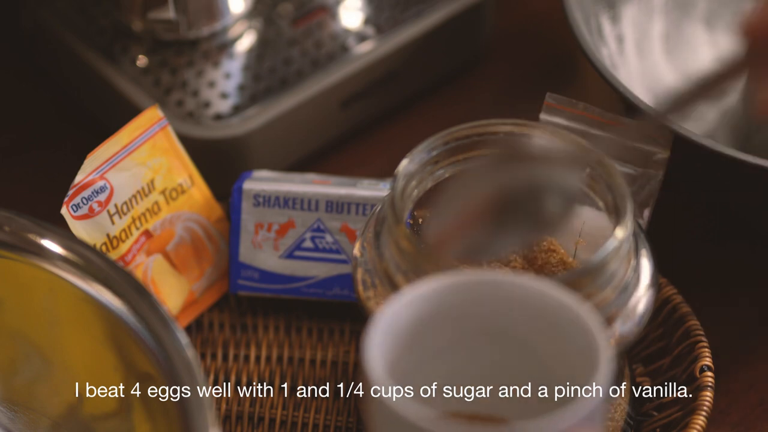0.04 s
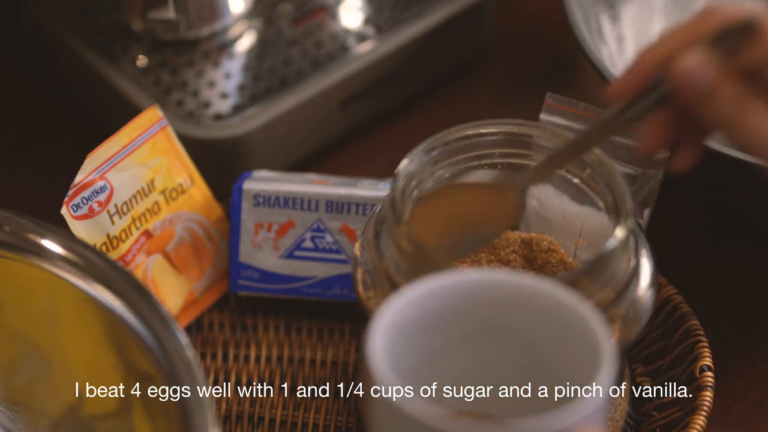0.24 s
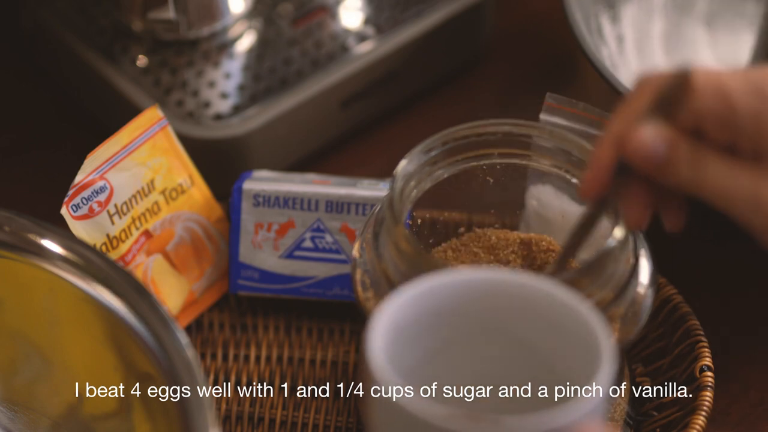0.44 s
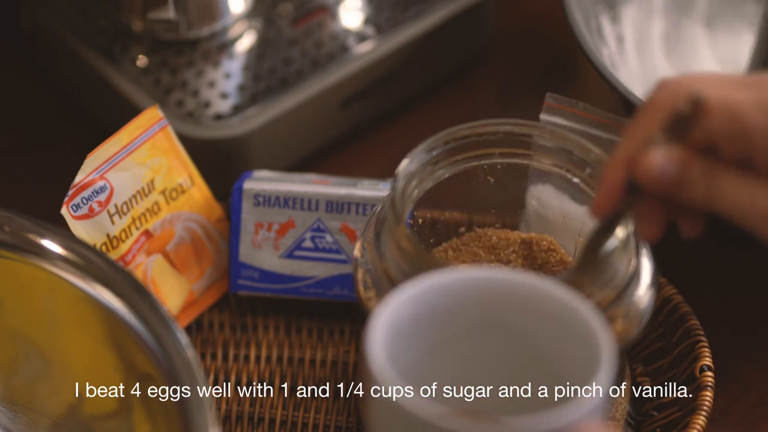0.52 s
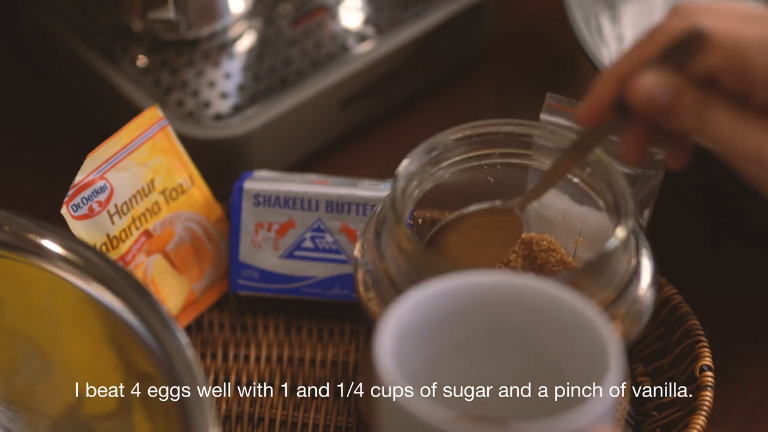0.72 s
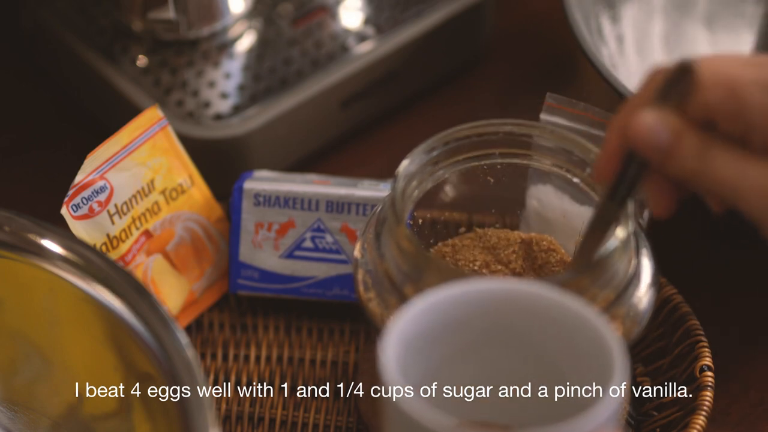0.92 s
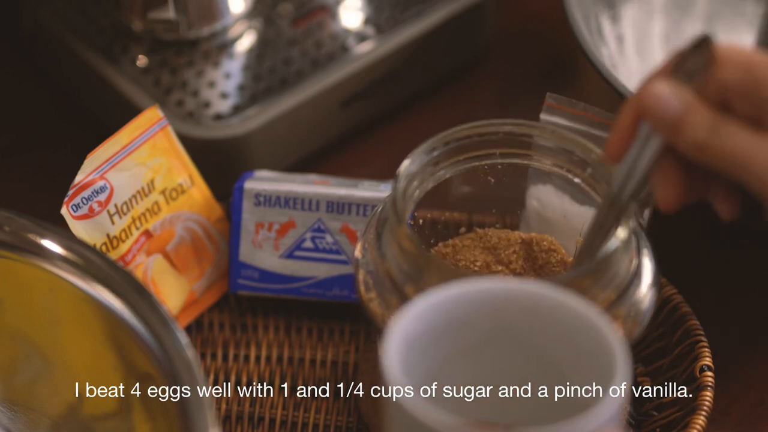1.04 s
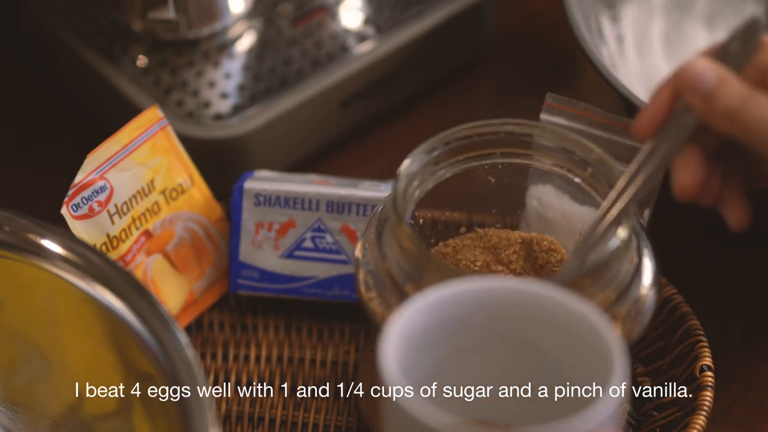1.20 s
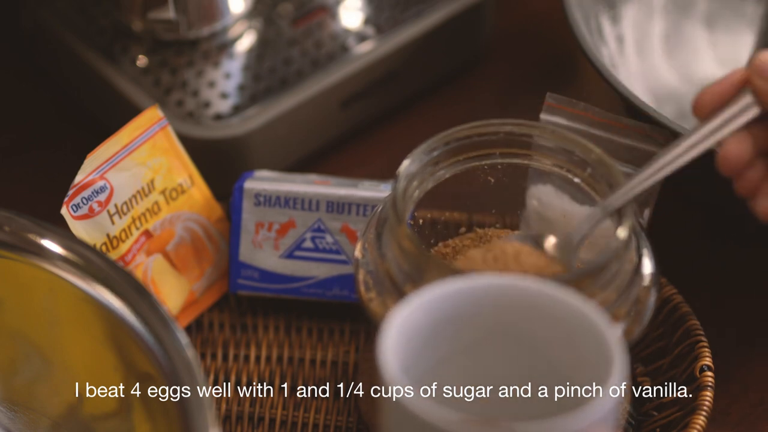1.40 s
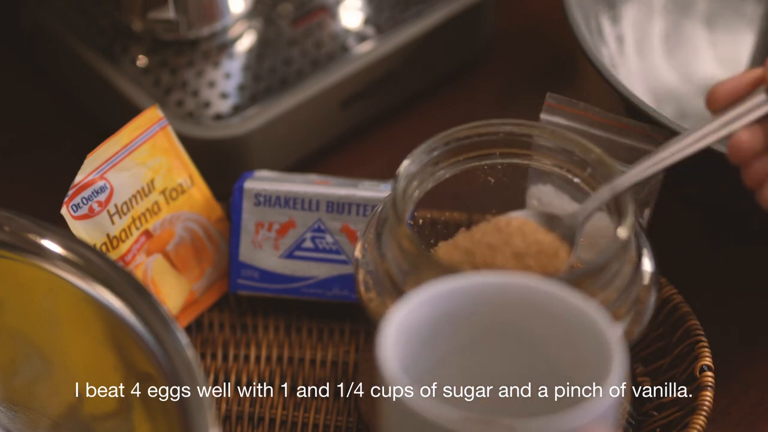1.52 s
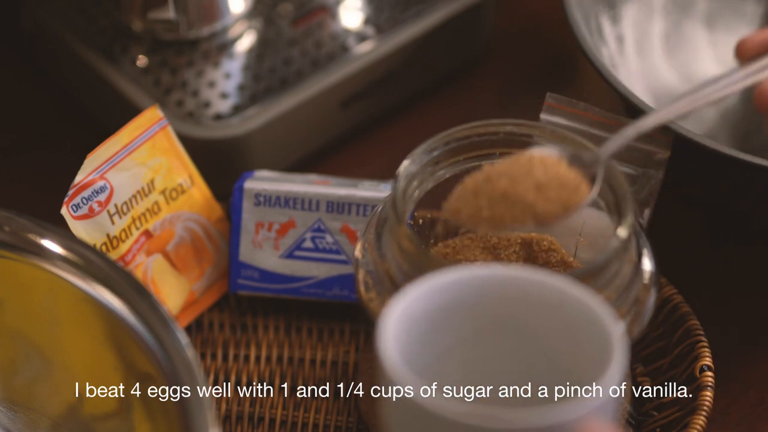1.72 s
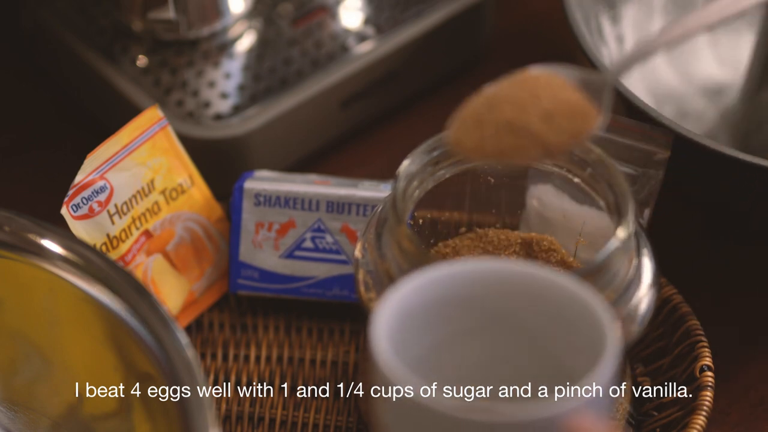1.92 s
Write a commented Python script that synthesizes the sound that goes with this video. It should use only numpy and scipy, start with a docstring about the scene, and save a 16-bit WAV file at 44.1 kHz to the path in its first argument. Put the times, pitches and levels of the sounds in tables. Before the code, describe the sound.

Close by in a quiet kitchen, a metal spoon strikes a glass jar with a sharp clink, then crunches through coarse sugar in small pushes, tapping the wall as the jar faintly bumps in a wicker basket.

```python
"""In a quiet kitchen, a metal spoon clinks into a glass jar and digs through coarse sugar.
Each contact excites the normal modes of spoon and glass; each push fractures crystals, a dense
train of impulses coloured by the air in the jar. The spoon knocks on the wall and squeaks once by
stick-slip friction, and the jar shifts with dull bumps in the wicker basket that it stands in."""
import sys
import numpy as np
from scipy import signal
from scipy.fft import rfft, irfft
from scipy.io import wavfile

SR = 44100
rng = np.random.default_rng(int(sys.argv[2]) if len(sys.argv) > 2 else 0)


def generate_wav(signal):
    """Clip the signal to [-1, 1] and save it as 16-bit WAV at the path in sys.argv[1]."""
    frames = np.transpose(np.atleast_2d(signal))
    scaled = np.clip(frames, -1, 1) * 32767
    pcm = np.round(scaled).astype(np.int16)
    wavfile.write(sys.argv[1], SR, pcm)


N = 85995
T = np.arange(N) / SR
HZ = np.maximum(np.arange(N // 2 + 1) * SR / N, 1)

# normal modes of spoon and jar: f/Hz, level/dB, t60/s
GLASS_MODES = [(1860, -26.5, 0.067), (2130, -19, 0.056), (2238, -18.5, 0.15), (2324, -16.5, 0.065),
               (2409, -14, 0.082), (3244, -22, 0.09), (3505, -20, 0.099), (3937, -11.5, 0.027),
               (4260, -12.5, 0.03), (4970, -20.5, 0.042), (8385, -18, 0.077), (9580, -32, 0.039)]
# hollow resonances of the jar on its support: f/Hz, level/dB, t60/s
HOLLOW_MODES = [(404, -3.5, .05), (498.4, -3, 0.083), (540.3, -5, 0.14), (665.4, -7.5, 0.047),
                (906, -7, 0.025)]
# shifts of the jar in the basket: peak t/s, rise/s, fall/s, thump level/dB, rub level/dB
JAR_SHIFTS = [(0.365, 0.04, 0.13, -63, -66.5), (0.428, 0.0059, 0.018, -70, -57.5),
              (0.500, 0.084, 0.024, -69, -66), (0.838, 0.017, 0.015, -59, -64.5),
              (1.070, 0.23, 0.31, -67.5, -69.5), (1.443, 0.011, 0.033, -67, -53),
              (1.495, 0.056, 0.037, -59.5, -57.5)]


def from_db(db):
    """Amplitude ratio of a level in decibels."""
    return 10 ** (np.asarray(db) / 20)


def unit_rms(x):
    """Normalisation to unit mean power."""
    return x / np.sqrt(np.mean(x ** 2) + 1e-20)


def at_hz(curve, hz):
    """Interpolation on a logarithmic frequency axis."""
    f, value = np.transpose(curve)
    return np.interp(np.log(hz), np.log(f), value)


def colour(x, spectrum, share=1):
    """Zero-phase filtering by a curve of f/Hz, gain/dB; share scales the decibels."""
    return irfft(rfft(x) * from_db(share * at_hz(spectrum, HZ)), N)


def resonator(x, hz, t60):
    """Damped harmonic oscillator: a unit impulse starts a decaying sine of amplitude 1."""
    radius, angle = from_db(-60 / (t60 * SR)), 2 * np.pi * hz / SR
    return signal.lfilter([0, np.sin(angle)], [1, -2 * radius * np.cos(angle), radius ** 2], x + 1e-18)


def body(x, modes, ring_share=1, pitch=1):
    """Modal superposition with alternating signs; ring_share scales decay times, pitch frequencies."""
    return sum((-1) ** k * from_db(db) * resonator(x, hz * pitch, t60 * max(ring_share, .05))
               for k, (hz, db, t60) in enumerate(modes))


def narrow_tone(hz, width_hz):
    """Narrow-band noise: two passes through one resonance leave a wavering tone of unit rms."""
    t60 = np.log(1000) / (np.pi * width_hz)
    return unit_rms(resonator(resonator(rng.standard_normal(N), hz, t60), hz, t60))


def swell(peak_s, rise_s, fall_s):
    """Gaussian envelope with separate widths before and after its peak."""
    return np.exp(-((T - peak_s) / np.where(T < peak_s, rise_s, fall_s)) ** 2)


def swells(rows):
    """Incoherent addition: swells sum in power, giving one envelope per level column."""
    power = sum((from_db(levels)[:, None] * swell(peak_s, rise_s, fall_s)) ** 2
                for peak_s, rise_s, fall_s, *levels in rows)
    return np.sqrt(power)


def grains():
    """Shot noise of unit rms: random impulses that swell in clumps, a few of them much louder."""
    grains_per_s, clumps_per_s, spread_db, clump_db = 3300, 430, 4.0, 3.0
    sizes = from_db(spread_db * np.minimum(rng.exponential(1, N), 5))
    signs = rng.choice([-1, 1], N)
    clumps = np.interp(T * clumps_per_s, np.arange(N), rng.standard_normal(N))
    onsets = rng.random(N) < grains_per_s / SR
    return unit_rms(sizes * signs * onsets * from_db(clump_db * clumps))


def room_tone():
    """Ambient noise: faint rumble and hiss, whose two channels are less coherent in the treble."""
    spectrum = [(12, -42), (20, -12), (49, 1.5), (74, -9.5), (146, -4.5), (172, -5), (301, -7),
                (434, -18.5), (642, -14), (780, -17.5), (849, -19.5), (1030, -23), (1120, -20.5),
                (1760, -27.5), (16000, -39.5)]  # noise density: f/Hz, relative level/dB
    width = [(60, -35.5), (180, -20.5), (550, -5.5), (1650, -0.5), (4970, 0.5), (15000, -0.5)]  # stereo width: f/Hz, side minus mid level/dB
    mid, side = unit_rms(colour(rng.standard_normal((2, N)), spectrum))
    return from_db(-63) * (mid + colour(side, width) * [[1], [-1]])


def kitchen(x, wet_db):
    """Reverberation: quick reflections from the jar and a diffuse tail join the direct sound, in stereo."""
    decay_times = [(200, .25), (2500, 0.27), (8000, 0.15), (15000, 0.31)]  # reverberation time: f/Hz, t60/s
    spectrum = [(100, -36), (500, -6), (2400, 0.5), (4500, -3.5), (9000, 10.5), (15000, -1)]  # reflected sound: f/Hz, relative level/dB
    jar_t60_s, first_echo_s = 0.015, .003
    t, tail, near = T[:SR // 2], 0, 0
    edges_hz = np.geomspace(60, 20000, 9)
    for low, high in zip(edges_hz, edges_hz[1:]):
        hz = np.sqrt(low * high)
        bandpass = signal.butter(2, [low, high], "band", fs=SR, output="sos")
        band = signal.sosfilt(bandpass, rng.standard_normal((2, 2, len(t))))
        band *= from_db(at_hz(spectrum, hz))
        tail = tail + band[0] * from_db(-60 * t / at_hz(decay_times, hz))
        near = near + band[1] * from_db(-60 * t / jar_t60_s)
    tail *= np.clip(t / first_echo_s - 1, 0, 1)
    echoes = (from_db(wet_db) * unit_rms(tail) + unit_rms(near)) / np.sqrt(len(t))
    return x + signal.fftconvolve(x[None], echoes, axes=1)[:, :N]


def rustle():
    """Friction noise: a soft brushing as the hand reaches in, before the spoon lands."""
    spectrum = [(3000, -32), (4700, 1), (6800, -4.5), (9000, -10), (15000, -11)]  # rustle density: f/Hz, relative level/dB
    envelope = from_db(-77.5) * swell(peak_s=0.01, rise_s=0.12, fall_s=0.096)
    return envelope * unit_rms(colour(grains(), spectrum))


def basket_thumps():
    """Low resonance: the pushed jar rocks the basket with a dull thump."""
    envelope, _ = swells(JAR_SHIFTS)
    return envelope * narrow_tone(hz=98.2, width_hz=15)


def basket_rubs():
    """Frictional excitation: the base of the jar rubs on the wicker and sounds its hollow resonances."""
    _, envelope = swells(JAR_SHIFTS)
    return envelope * unit_rms(body(grains(), HOLLOW_MODES))


def squeak():
    """Stick-slip friction of metal on glass gives one short chirp."""
    partials = [(2675, 130, -51), (4357, 93, -42.5), (14050, 160, -64)]  # tones of the squeak: f/Hz, bandwidth/Hz, level/dB
    tones = sum(from_db(db) * narrow_tone(hz, width_hz) for hz, width_hz, db in partials)
    return swell(peak_s=1.129, rise_s=.0025, fall_s=.014) * tones


def sugar():
    """Brittle fracture: crushed crystals excite the jar's air; those at the wall drive the damped glass."""
    # pushes of the spoon: peak t/s, rise/s, fall/s, crunch level/dB, rasp level/dB
    pushes = [(0.200, 0.018, 0.034, -79.5, -100), (0.360, 0.075, 0.035, -55, -59),
              (0.390, 0.029, 0.0088, -55, -81), (0.425, .01, 0.01, -54.5, -59),
              (0.480, 0.028, 0.074, -64.5, -67.5), (0.690, 0.014, 0.021, -56, -73),
              (0.720, 0.019, 0.004, -56.5, -55), (0.768, 0.018, 0.015, -51.5, -91),
              (0.818, 0.035, 0.0067, -58, -63.5), (0.955, 0.035, 0.03, -57, -56),
              (1.030, 0.021, 0.057, -60.5, -57), (1.068, 0.023, 0.021, -51, -52),
              (1.110, 0.0027, 0.052, -53.5, -51), (1.200, 0.014, 0.011, -62, -49),
              (1.244, 0.013, 0.02, -57, -52.5), (1.380, 0.024, 0.0061, -57.5, -54.5),
              (1.456, 0.014, 0.021, -57.5, -56), (1.497, 0.02, 0.006, -59, -56)]
    fracture_spectrum = [(200, 0), (600, 1.5), (1300, -2), (2000, -6), (3700, 0.5), (5500, 1.5), (7300, 0),
                         (9500, -1.5), (10600, -4), (12000, -7), (13300, -3), (15500, -7.5)]  # breaking crystals: f/Hz, relative level/dB
    air_modes = [(2430, -8.5, 0.026), (3406, 0, 0.014), (3846, -4.5, 0.051), (4150, -11, 0.064),
                 (6510, -6.5, 0.018), (7325, -2.5, 0.027), (8260, -4.5, 0.0062), (10700, -12.5, 0.042),
                 (11640, -6.5, 0.032)]  # cavity resonances: f/Hz, level/dB, t60/s
    coupling = [(1000, 11), (1700, 6), (2130, 1), (2350, -4), (2650, 10), (2900, 8), (3400, 0), (3900, -9),
                (4300, -2), (5200, -16.5), (12000, -12)]  # how the rasp drives the glass: f/Hz, gain/dB
    crunch_envelope, rasp_envelope = swells(pushes)
    fracture = unit_rms(colour(grains(), fracture_spectrum))
    cavity = from_db(-2.5) * unit_rms(body(grains(), air_modes))
    rasp = colour(body(grains(), GLASS_MODES, ring_share=0.3), coupling)
    return crunch_envelope * unit_rms(fracture + cavity) + rasp_envelope * unit_rms(rasp)


def clinks():
    """Impact excitation: contacts crack, ring spoon and glass, and knock the hollow; soft ones are duller."""
    # spoon meets glass: t/s, level/dB, low-pass f/Hz, hollow knock level/dB,
    # share of the ring time left by sugar and hand, pitch ratio
    contacts = [(0.2457, -18, 15000, -54, 1.0, 1.0), (0.2478, -22, 11000, -66, 1.0, 1.0),
                (0.2605, -35, 12000, -70, .7, 1.0), (0.341, -48, 7000, -66, .7, 1.0),
                (0.5296, -47, 4500, -61, .7, 1.0), (0.6857, -45, 9000, -68, .8, 1.0),
                (0.9501, -37, 5000, -54, .7, .96), (1.1267, -41, 6000, -64, .5, 1.07),
                (1.1638, -34, 2900, -50, .7, .95), (1.1981, -43, 3800, -62, .6, .97),
                (1.3472, -31, 3000, -56, .65, .98), (1.3752, -36, 3200, -47, .4, 1.02),
                (1.4555, -35, 3400, -52, .4, 1.0), (1.4765, -39, 4000, -54, .35, 1.0),
                (1.4925, -34, 3200, -49, .5, 1.2)]
    crack_spectrum = [(300, -21.5), (1000, -17), (1500, -14), (2200, 10), (2800, 1.5), (4200, 2.5),
                      (5800, -10), (8500, -9), (10000, -5), (11000, -14), (12250, -0.5), (13500, -10.5),
                      (15000, -6.5)]  # contact noise: f/Hz, gain/dB
    crack_db, crack_t60_s, chatter_db = -7.5, 0.043, -28
    grit_db = -11.5  # crystals pinched in a contact snap brightly, however soft the blow
    t = T[:SR // 4]
    impulse = 1. * (t == 0)
    rings, cracks = np.zeros((2, N + len(t)))
    for start_s, db, cutoff_hz, knock_db, ring_share, pitch in contacts:
        span = slice(int(start_s * SR), int(start_s * SR) + len(t))
        burst = rng.standard_normal(len(t)) * from_db(-60 * t / crack_t60_s)
        lowpass = signal.butter(2, cutoff_hz, fs=SR)
        blow = from_db(db) * signal.lfilter(*lowpass, impulse + from_db(chatter_db) * burst)
        rings[span] += body(blow, GLASS_MODES, ring_share, pitch)
        rings[span] += from_db(knock_db) * body(impulse, HOLLOW_MODES)
        cracks[span] += from_db(db) * (signal.lfilter(*lowpass, burst) + from_db(grit_db) * burst)
    return rings[:N] + from_db(crack_db) * colour(cracks[:N], crack_spectrum)


def scene():
    """Superposition of the sources; a level difference between channels sets the jar slightly right."""
    balance = [(100, -9), (500, 1), (3000, 1), (8500, 2.5), (12000, 0.5), (15000, 0.5)]  # stereo balance: f/Hz, right minus left level/dB
    jar = kitchen(clinks(), wet_db=-3)
    jar += kitchen(sugar() + squeak() + rustle(), wet_db=2)
    jar += kitchen(basket_rubs(), wet_db=-7)
    return colour(jar, balance, share=np.array([[-.5], [.5]])) + basket_thumps() + room_tone()


def record(dry):
    """Band limiting: an elliptic low-pass cuts the highest treble steeply."""
    cutoff_hz = 15980
    return signal.sosfilt(signal.ellip(12, .1, 70, cutoff_hz, fs=SR, output="sos"), dry)


dry = scene()
out = record(dry)
generate_wav(out)
```